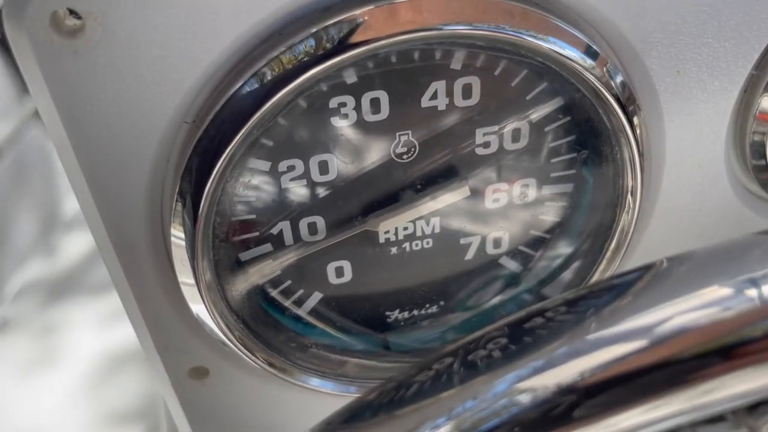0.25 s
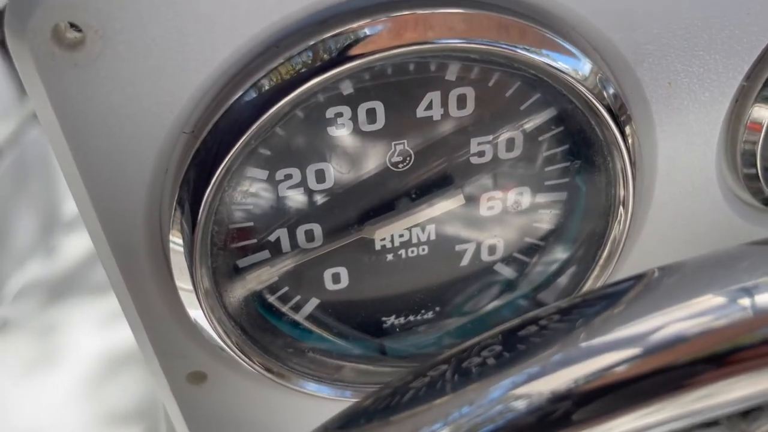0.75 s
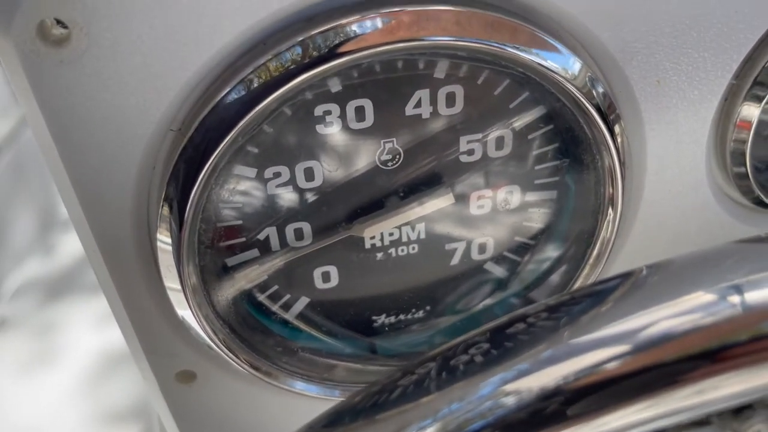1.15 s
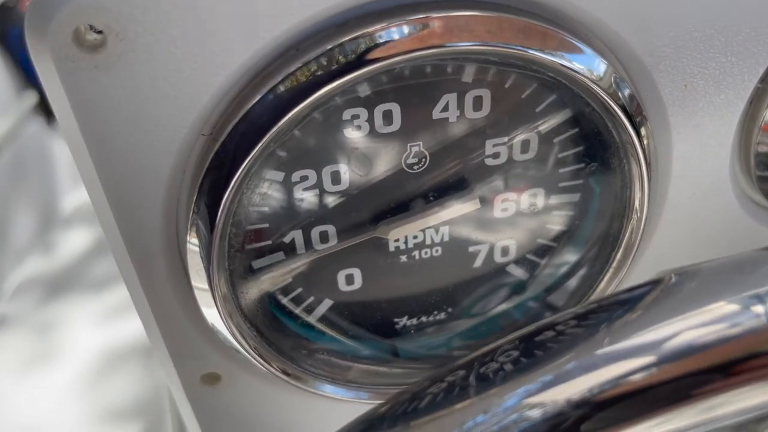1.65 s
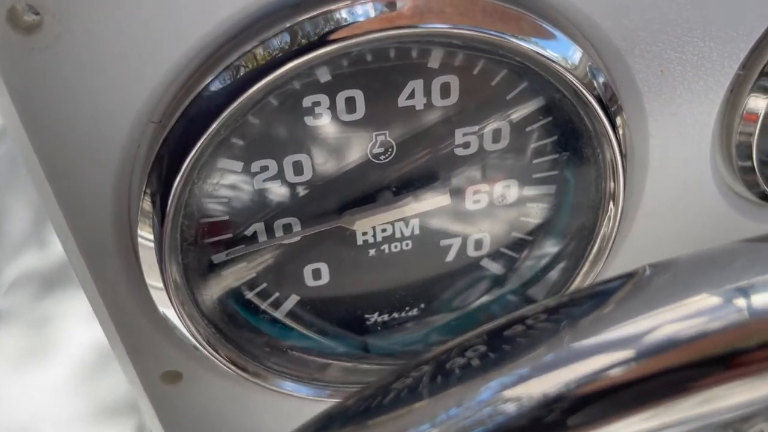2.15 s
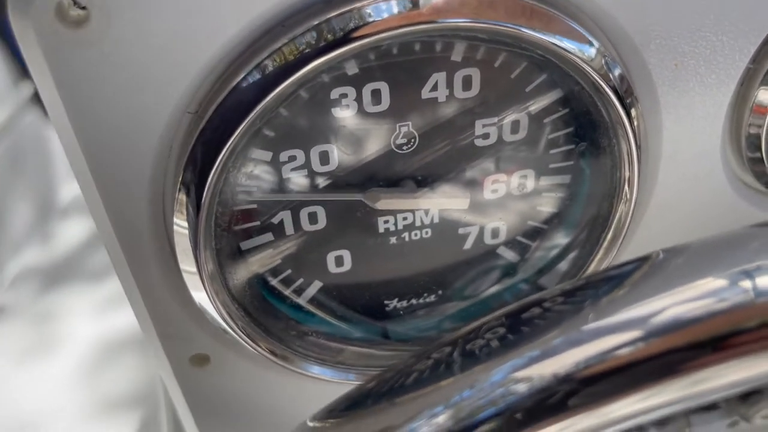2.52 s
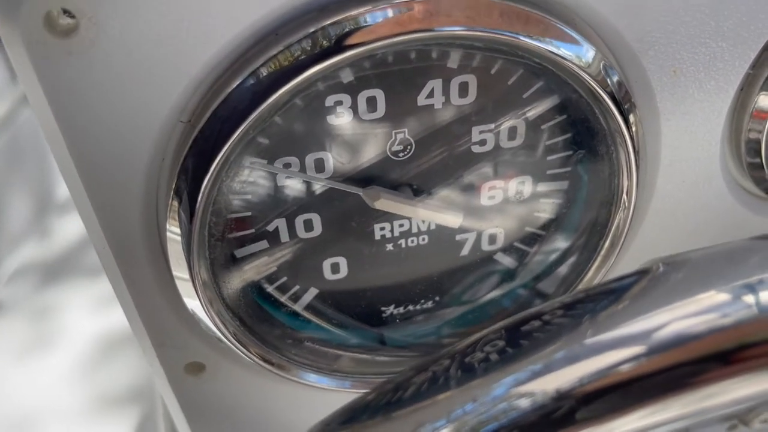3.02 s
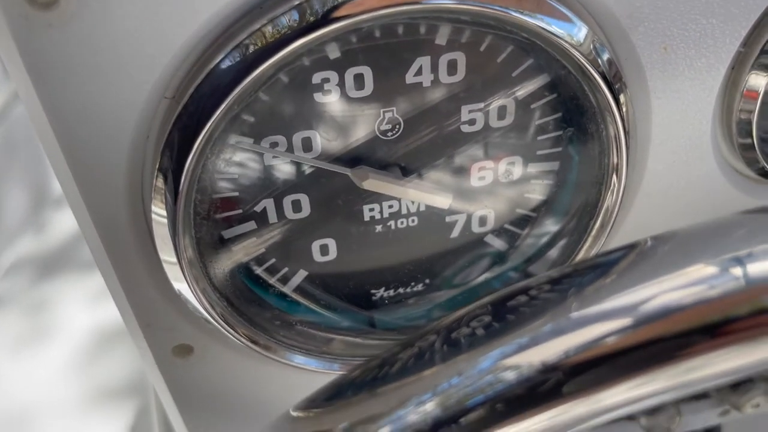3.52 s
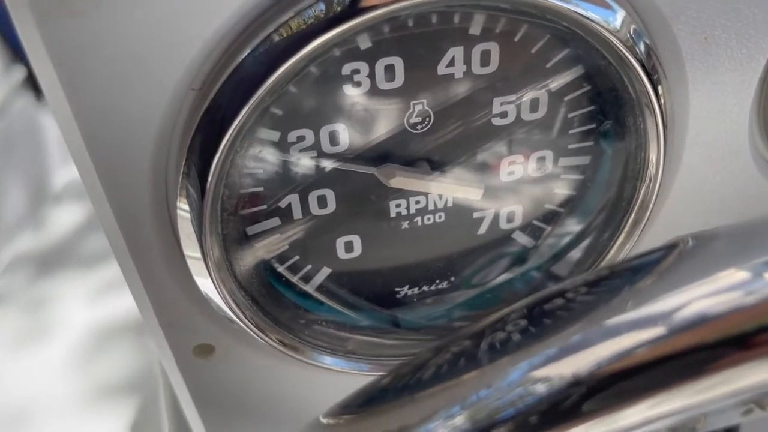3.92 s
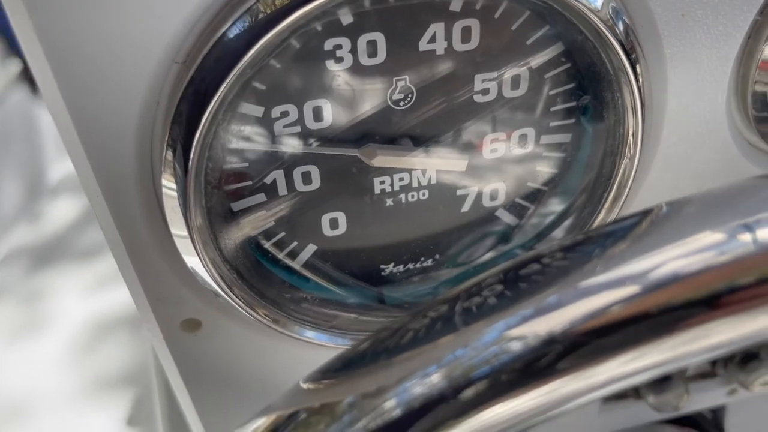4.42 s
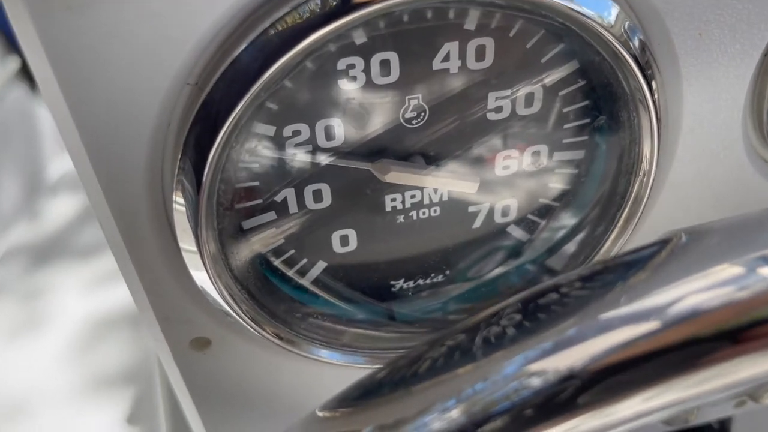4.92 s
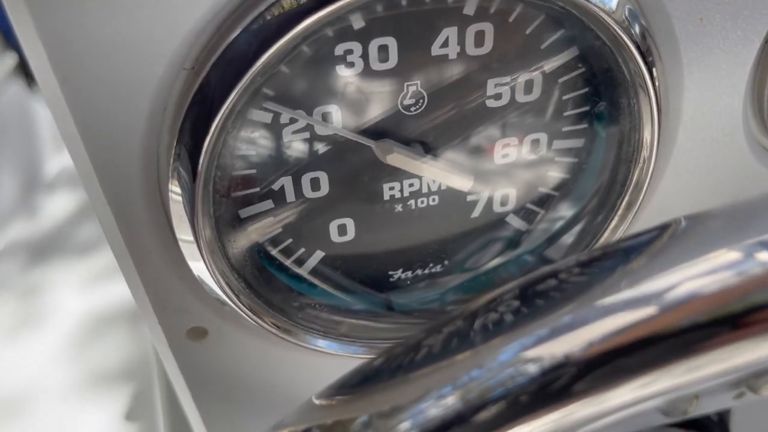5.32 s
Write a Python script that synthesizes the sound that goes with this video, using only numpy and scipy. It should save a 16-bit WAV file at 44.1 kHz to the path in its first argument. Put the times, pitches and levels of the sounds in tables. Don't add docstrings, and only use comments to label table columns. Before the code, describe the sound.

At the helm of a small boat, a few steps ahead of a four-stroke outboard, a stereo microphone picks up a booming idle, clattering valve gear and hissing cooling water. After nearly two seconds it misses a beat, surges up with a rush of intake air, sinks gradually, then is blipped up again and begins to ease.

```python
import sys
import numpy as np
from scipy import signal
from scipy.fft import rfft, irfft
from scipy.io import wavfile
from scipy.ndimage import uniform_filter1d

SR = 44100
rng = np.random.default_rng(int(sys.argv[2]) if len(sys.argv) > 2 else 0)


def linear_from_db(decibels):
    return 10 ** (np.asarray(decibels, float) / 20)


def int16_out(signal):
    q = np.round(np.clip(np.atleast_2d(signal).T, -1, 1) * 32767)
    wavfile.write(sys.argv[1], SR, q.astype(np.int16))


N = 245681

# (frequency [Hz], width [Hz], level [dB])
HULL_PANELS = [(56.5, 7.8, -20), (140.6, 9.7, -9.5), (187.5, 15, -20.5), (229.3, 21, -13.5),
               (269, 34, -24.5), (318.3, 14, -13), (349.6, 24.5, -11), (396.4, 28, -11.5), (455, 46, -13.5),
               (616.7, 51, -20)]


def evened(x):
    return x / np.sqrt(np.mean(x ** 2) + 1e-20)


def read(points, hz):
    f, value = np.transpose(points)
    return np.interp(np.log(hz + 1), np.log(f + 1), value)


def with_modes(points, modes, hz):
    peaks = sum(linear_from_db(2 * db) / (1 + (2 * (hz - f) / width) ** 2) ** 2 for f, width, db in modes)
    return np.sqrt(linear_from_db(2 * read(points, hz)) + peaks)


def causal(gain):
    log_gain = np.log(np.r_[gain, gain[-2:0:-1]] + 1e-6)
    spectrum = np.exp(np.conj(signal.hilbert(log_gain)))
    return np.fft.ifft(spectrum).real[:len(gain) // 2]


def drift(span_s):
    size = round(span_s * SR)
    wander = uniform_filter1d(rng.standard_normal(N), size)
    return evened(uniform_filter1d(wander, size))


def speed(column):
    # (time [s], firing rate [Hz], throttle opening [0-1])
    throttle_moves = [(0, 25.3, 0.2), (.53, 24.95, 0), (.93, 28.69, 0), (1.801, 32.46, 0.1),
                      (2.061, 39.82, 1), (2.311, 62.7, 1), (2.441, 77.25, .9), (2.568, 80.48, 0.57),
                      (3.0, 68.78, 0), (3.691, 54.24, 0.22), (4.331, 46.69, 0.45), (4.439, 48.48, 0.9),
                      (4.58, 57.58, 0.9), (4.69, 60.41, 0.84), (4.93, 78.4, 1), (5.099, 80.6, 0.71),
                      (5.381, 74.18, .5), (5.57, 72.65, .2)]
    flywheel_s = 0.077
    rows = np.transpose(throttle_moves)
    course = np.interp(np.arange(N) / SR, rows[0], rows[column])
    return uniform_filter1d(course, round(flywheel_s * SR), mode="nearest")


def firing_turns():
    misfire_s = 1.872
    turns = np.cumsum(speed(column=1)) / SR
    return turns - np.interp(misfire_s, np.arange(N) / SR, turns)


def level_db(idle_db, doubling_db, throttle_db, knock=0):
    idle_hz = 25
    knock_s, knock_fade_s, knock_peak_db = 0.008, 0.012, 9
    since = np.arange(N) / SR - knock_s
    knock_db = knock_peak_db * (since > 0) * np.exp(-abs(since) / knock_fade_s)
    speed_db = doubling_db * np.log2(speed(column=1) / idle_hz)
    return idle_db + speed_db + throttle_db * speed(column=2) + knock * knock_db


def port_noise(gain_of_hz, patchy_db, flicker_db, size=512):
    # (frequency [Hz], likeness [0-1])
    likeness = [(60, 1), (250, 0.57), (500, 0.33), (1500, 0.16), (3000, 0.42), (5200, 0.33), (6000, 0.73),
                (7100, 0.081), (8300, 0.98), (15000, 0.93)]
    # (frequency [Hz], phase [rad])
    right_lead = [(60, 0), (1000, 0), (1800, 1.16), (2800, -0.56), (6000, -1.3), (7700, -0.5), (8600, 0.5),
                  (9900, 3.0), (10350, 3.3), (11600, 6.3), (13250, 9.42)]
    # (frequency [Hz], level [dB])
    left_over_right = [(60, -1.0), (130, -5), (270, 2), (590, -3), (1260, 4), (2690, 3.0), (5750, 2),
                       (12300, -0.5)]
    frames, hz = 4 * N // size + 5, np.fft.rfftfreq(size, 1 / SR)
    a, b, c, d, patches = rng.standard_normal((frames, len(hz), 5)).T
    patches = uniform_filter1d(patches, size=30, axis=0)
    patches = evened(uniform_filter1d(patches, size=10, axis=1))
    flicker = evened(uniform_filter1d(rng.standard_normal(frames), size=8 * 512 // size))
    same = np.clip(read(likeness, hz), 0, 1)[:, None]
    lead = np.interp(hz, *np.transpose(right_lead))[:, None]
    left = a + 1j * b
    right = same * left + np.sqrt(1 - same ** 2) * (c + 1j * d)
    right = right * np.exp(1j * lead)
    tilt = linear_from_db(read(left_over_right, hz) / 2)[:, None]
    ports = np.array([left * tilt, right / tilt])
    ports = ports * gain_of_hz(hz)[:, None] * linear_from_db(patchy_db * patches + flicker_db * flicker)
    noise = signal.istft(ports, nperseg=size, noverlap=3 * size // 4)[1]
    return evened(noise[:, :N])


def exhaust(turns):
    # (multiple of the firing rate, level [dB])
    pulse_orders = [(1, -1), (2, -5), (3, -13), (4, -13), (6, -18), (10, -22.5), (24, -31.5)]
    # (frequency [Hz], level [dB])
    hull_tone = [(15, -85), (26, -80), (33, -31), (45, -21), (55, -8.5), (68, -8.5), (80, -6.5), (95, -6.5),
                 (112, -13), (135, -9), (152, -24), (165, -27.5), (500, -33), (900, -49.5)]
    # (frequency [Hz], level [dB])
    boom_side = [(40, -29.5), (90, -20.5), (110, -31), (135, -18.5), (200, -4), (230, -23), (300, -14.5),
                 (500, 2)]
    uneven_db, late_turns, side_lag_s = 0.55, 0.006, 0.0006
    sharp_orders, scatter_rad = 5, 1.6

    firing = np.round(turns).astype(int)
    strength_db, lateness = rng.standard_normal((600, 2))[firing - firing[0]].T
    fires = firing != 0
    strength = uniform_filter1d(linear_from_db(uneven_db * strength_db) * fires, size=150)
    place = 2 * np.pi * (turns + late_turns * uniform_filter1d(lateness, size=300))
    pulses = np.zeros(N)
    for k in range(1, 25):
        phase = k * place
        if k > sharp_orders:
            phase = phase + scatter_rad * drift(span_s=0.49)
        pulses += np.sqrt(2) * linear_from_db(read(pulse_orders, k)) * np.cos(phase)
    push_db = level_db(idle_db=-3.28, doubling_db=0.51, throttle_db=1.3, knock=0.61)
    pulses = pulses * strength * linear_from_db(push_db)

    hull = with_modes(hull_tone, HULL_PANELS, np.fft.rfftfreq(2 ** 15, 1 / SR))
    mid = signal.fftconvolve(pulses, causal(hull))[:N]
    hz = np.fft.rfftfreq(N, 1 / SR)
    side_turn = np.exp(-2j * np.pi * hz * side_lag_s)
    side = irfft(rfft(mid) * linear_from_db(read(boom_side, hz)) * side_turn, N)
    return np.array([mid - side, mid + side])


def rumble():
    # (frequency [Hz], density [dB per Hz])
    turbulence = [(20, -8), (60, -6.5), (140, 4), (190, -5.5), (400, -3.5), (500, -6), (700, -8.5),
                  (1000, -51)]
    panels = [(f, width, db + 9.5) for f, width, db in HULL_PANELS[1:]]
    noise = port_noise(lambda hz: with_modes(turbulence, panels, hz),
                       patchy_db=1.1, flicker_db=0.5, size=4096)
    rumble_db = -34.5 + level_db(idle_db=-5, doubling_db=6.9, throttle_db=0.39, knock=0.74)
    return linear_from_db(rumble_db) * noise


def clatter(turns):
    # (frequency [Hz], density [dB per Hz])
    cowl_tone = [(300, -25), (600, -3), (850, -10), (1500, -12), (2200, -16), (4000, -26), (7000, -36),
                 (9000, -50)]
    # (frequency [Hz], width [Hz], level [dB])
    cowl_modes = [(1026, 20, 3), (1113, 17.3, 4), (1218, 13, 2), (1719, 40, -3.5), (1865, 136, -7),
                  (2377, 29, -11.5), (2720, 120, -16.5), (3187, 56, -13)]
    noise = port_noise(lambda hz: with_modes(cowl_tone, cowl_modes, hz),
                       patchy_db=1.0, flicker_db=0.0, size=2048)
    clatter_db = level_db(idle_db=-45.5, doubling_db=7.4, throttle_db=1.9, knock=0.86)
    clatter_db = clatter_db + 1.5 + 0.66 * drift(span_s=0.07)
    throb = 1 + 0.06 * np.cos(2 * np.pi * turns)
    return linear_from_db(clatter_db) * throb * noise


def intake():
    # (frequency [Hz], density [dB per Hz])
    air_rush = [(1500, -25), (2600, -2), (4000, 2), (6000, -6), (8000, -27)]
    noise = port_noise(lambda hz: linear_from_db(read(air_rush, hz)), patchy_db=1.5, flicker_db=1.3, size=1024)
    return linear_from_db(level_db(idle_db=-63, doubling_db=1.9, throttle_db=16.2)) * noise


def water():
    # (frequency [Hz], density [dB per Hz])
    stream = [(1500, -37), (3500, -13.5), (5000, -2), (6000, 0), (7500, -3.5), (9500, 1.5), (11300, 2),
              (11900, -1), (13000, -12), (14300, -30), (16000, -50)]
    # (time [s], peak level [dB], frequency [Hz])
    spatters = [(0.0662, -38, 9070), (0.2139, -36.5, 4720), (0.4894, -40, 5770), (0.609, -43, 4350),
                (0.6596, -38, 8630), (0.7894, -42, 8750), (0.9418, -39, 4370), (0.9797, -36.5, 6070),
                (1.1623, -40, 5240), (1.452, -39, 7500), (1.55, -38.5, 7700), (1.7998, -41, 8590),
                (1.8896, -37, 9000)]
    hiss = port_noise(lambda hz: linear_from_db(read(stream, hz)), patchy_db=1.12, flicker_db=0.62)
    hiss_db = level_db(idle_db=-48.5, doubling_db=1.56, throttle_db=3.1)
    out = linear_from_db(hiss_db + 4.5 + 0.54 * drift(span_s=0.038)) * hiss

    t = np.arange(1500) / SR
    burst = np.minimum(t / 0.00088, 1) * np.exp(-t / 0.0072)
    ports = linear_from_db(np.array([[1.2], [-1.2]]))
    for s, db, hz in spatters:
        edges = np.clip([0.64 * hz, 1.6 * hz], 100, 9600)
        band = signal.butter(2, edges, "bandpass", fs=SR)
        splash = evened(signal.lfilter(*band, rng.standard_normal(len(t)))) * burst
        at = round(s * SR)
        out[:, at:at + len(t)] += linear_from_db(db - 1.5) * splash * ports
    return out


def pump():
    # (frequency [Hz], width [Hz], level [dB])
    whine = [(2736, 32, 3), (1722, 33, 4), (1102, 36, 5.5), (1853, 45, -2.5)]
    floor = [(100, -80), (9000, -80)]  # (frequency [Hz], density [dB per Hz])
    noise = port_noise(lambda hz: with_modes(floor, whine, hz), patchy_db=3.0, flicker_db=2.5, size=2048)
    return linear_from_db(-52.5) * noise


def squeaks():
    # (time [s], start frequency [Hz], level [dB])
    rubs = [
        (4.33, 2850, -41.5),
        (5.37, 1900, -39),
        (5.43, 1850, -48),
    ]
    length_s, sag = 0.063, 0.093
    out = np.zeros(N)
    u = np.arange(0, length_s, 1 / SR) / length_s
    for s, hz, db in rubs:
        at = round(s * SR)
        phase = 2 * np.pi * np.cumsum(hz * (1 - sag * u)) / SR
        out[at:at + len(u)] += linear_from_db(db) * np.sin(np.pi * u) * np.sin(phase)
    return out * linear_from_db(np.array([[1.5], [-1.5]]))


def scene():
    turns = firing_turns()
    engine = exhaust(turns) + rumble() + clatter(turns) + intake()
    return engine + water() + pump() + squeaks()


def roll_off(x):
    return signal.sosfilt(signal.butter(12, 14400, fs=SR, output="sos"), x)


def record(dry):
    return roll_off(dry)


dry = scene()
out = record(dry)
int16_out(out)
```